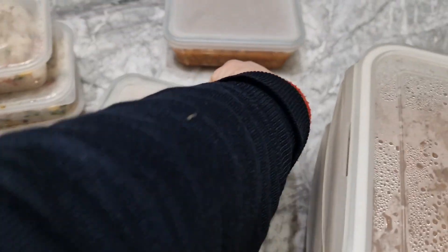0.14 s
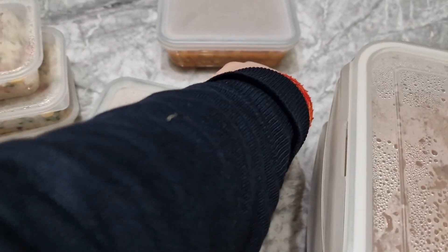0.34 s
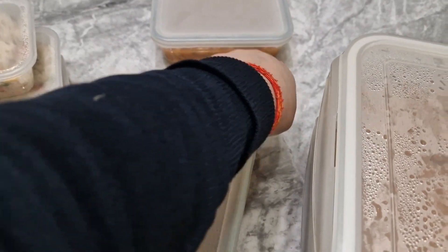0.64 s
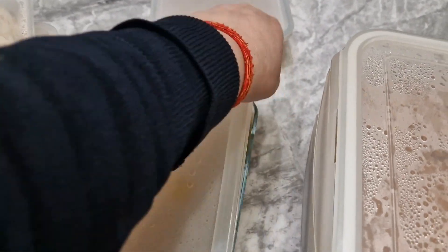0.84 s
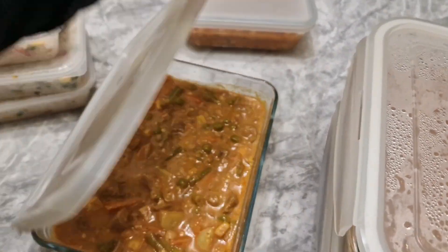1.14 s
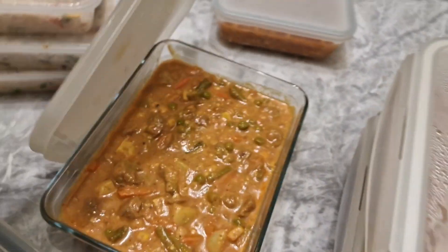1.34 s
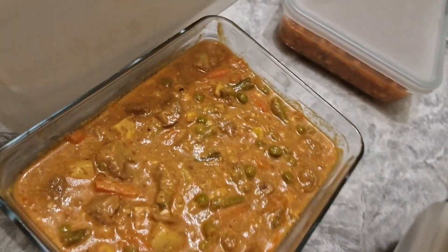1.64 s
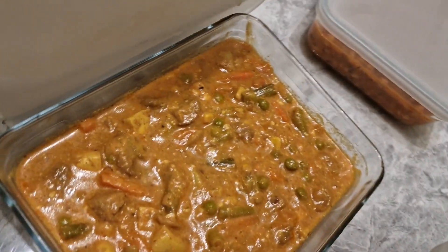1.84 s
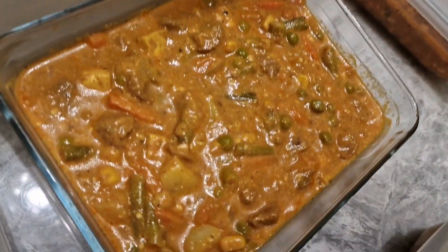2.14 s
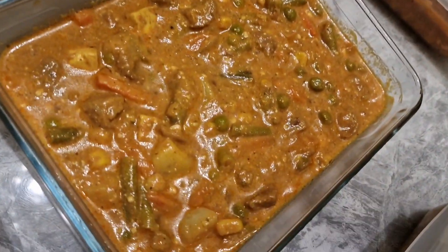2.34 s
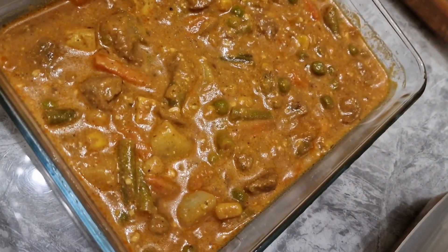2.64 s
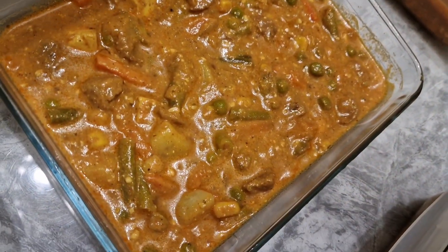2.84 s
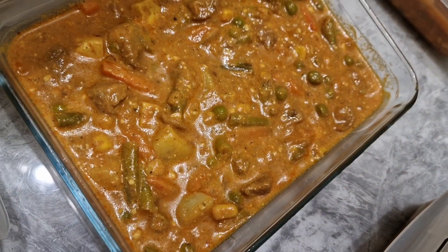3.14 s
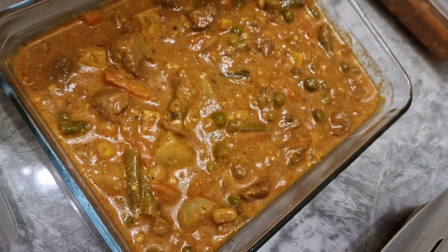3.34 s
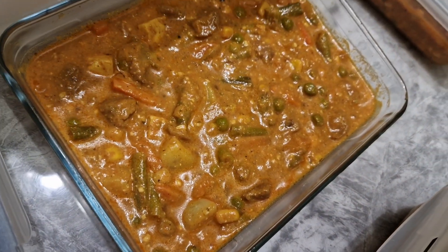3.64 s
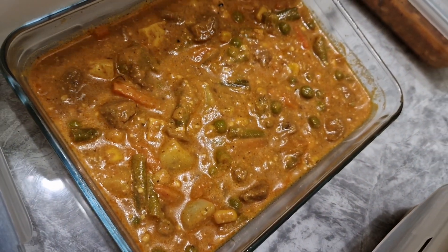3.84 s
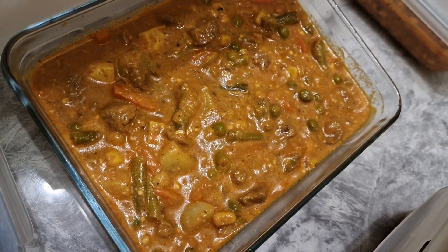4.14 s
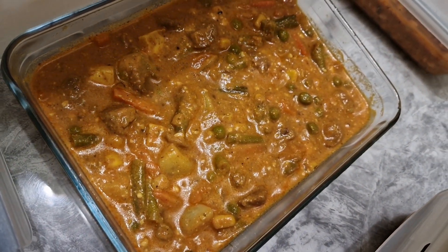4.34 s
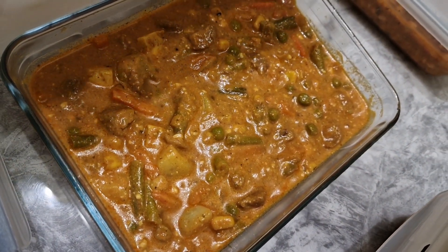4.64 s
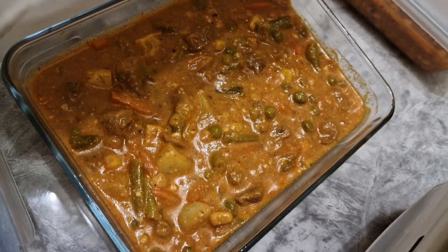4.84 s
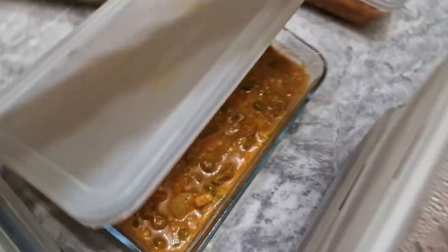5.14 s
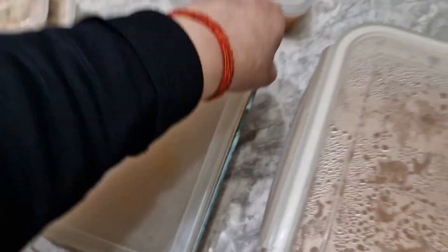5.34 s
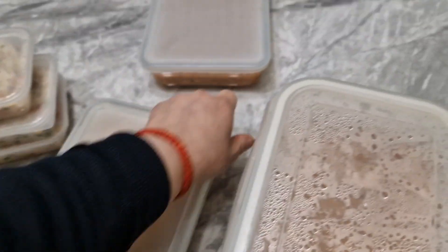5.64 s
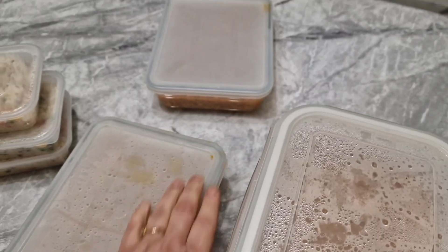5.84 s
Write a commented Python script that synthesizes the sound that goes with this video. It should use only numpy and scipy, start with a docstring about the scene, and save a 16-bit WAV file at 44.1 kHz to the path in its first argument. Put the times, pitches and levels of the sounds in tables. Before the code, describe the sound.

A quiet kitchen with a faint low room hush, heard through close stereo microphones. At about 0.1 s two quick plastic lid taps sound, followed around 0.3 s by a soft, rumbling sleeve brush. At 0.8 s a bright lid snap and a box knock land close together, with another firm knock at 1.3 s. The hardest clatter comes at 1.55-1.6 s, several sharp impacts run together and ringing in the room. Lighter bumps follow at 2.0 and 2.2 s, a small rattling cluster at 2.4 s, then faint scrapes near 2.9 s. Deeper hollow thunks build around 3.5-3.65 s, capped by a hard clack at 3.9 s. Softer lid and box taps continue at 4.1-4.2 s, with a dull low thud at 4.6 s. Tiny rim clicks, a sleeve brush at 5.1 s, a muted lid thunk at 5.5 s and slight scraping finish it.

```python
"""Over a quiet room, lids of plastic food boxes are struck, pressed and made to squeak; a sleeve brushes,
short swells scrape and hiss, rims click. Then come louder knocks of boxes on a stone countertop in a live
kitchen, with faint rubs and scuffs among them, and more lids.
A contact sums filtered clack and snap pulses, decaying box modes and a counter thud, then excites the room.
Rubs are coloured noise in grainy swells; two close-set microphones are alike in the bass only."""
import sys
import numpy as np
from scipy import signal
from scipy.fft import rfft, irfft, next_fast_len
from scipy.io import wavfile
from scipy.ndimage import map_coordinates

SR = 44100
rng = np.random.default_rng(int(sys.argv[2]) if len(sys.argv) > 2 else 0)


def wav_record(signal):
    """Record a signal, one row per channel, as 16-bit PCM in the file named by sys.argv[1]."""
    frames = np.transpose(np.atleast_2d(signal))
    bounded = np.clip(frames, -1, 1)
    # unit amplitude maps onto the largest positive 16-bit level
    quanta = np.round(bounded * 32767).astype(np.int16)
    wavfile.write(sys.argv[1], SR, quanta)


N = 263718
ROOM_SAMPLES = SR  # length of one room response
LEAD = SR // 50  # samples kept free ahead of a contact
T = np.arange(ROOM_SAMPLES) / SR
LARGE_HZ, MEDIUM_HZ, SMALL_HZ = 334, 426, 622  # hollow notes of the three boxes
# left-right likeness of diffuse sound: hz, correlation
ALIKE = [(100, 0.99), (300, 0.84), (520, 0.8), (900, -0.14), (1800, -0.096), (4000, -0.019)]
# standing waves of the kitchen: hz, level_db, t60_s
STANDING = [(69.75, 0.5, 0.99), (106.84, 4, 0.59), (134.9, -2.5, 0.61), (163.6, 0.5, 0.62),
            (177.9, -0.5, 0.34), (267.6, -5.5, 0.88), (381.5, -6.5, 0.9), (514, 5, 0.28), (626, -5.5, 0.8),
            (748, 9.5, 0.28), (893, -3, 0.74), (978, 4.5, 0.32), (1230, 11, 0.19), (1333, 6.5, 0.5),
            (1447, 7, 0.7), (1810, 2.5, 0.18)]


def amp(db):
    """Decibels to gain."""
    return 10 ** (np.asarray(db) / 20)


def unit(x):
    """x at rms 1."""
    return x / np.sqrt(np.mean(x ** 2) + 1e-20)


def blow(x):
    """x with the energy of 10 ms at rms 1."""
    return unit(x) * np.sqrt(.01 * SR / x.shape[-1])


def fade(t, t60):
    """A decay that loses 60 dB in t60 seconds."""
    return np.exp(-np.log(1000) * t / np.maximum(t60, 1e-4))


def along(points, hz):
    """Interpolate (hz, value) points on a log frequency axis."""
    f, v = np.transpose(points)
    return np.interp(np.log(hz + 1), np.log(f + 1), v)


def filtered(x, response):
    """x times a response of frequency."""
    n = x.shape[-1]
    m = next_fast_len(n + 4096)
    return irfft(rfft(x, m) * response(np.fft.rfftfreq(m, 1 / SR)), m)[..., :n]


def pulse(spectrum, size=4096):
    """The shortest causal (minimum-phase) pulse with this spectrum, by folding the cepstrum."""
    cepstrum = irfft(np.log(amp(along(spectrum, np.fft.rfftfreq(size, 1 / SR)))))
    cepstrum[1:size // 2] *= 2
    cepstrum[size // 2 + 1:] = 0
    return irfft(np.exp(rfft(cepstrum)))


def stereo_angle(hz):
    """Half the angle whose cosine is the left-right likeness."""
    return np.arccos(np.clip(along(ALIKE, hz), -1, 1)) / 2


def diffuse(size):
    """White noise from all sides: alike at both microphones in the bass only."""
    def mid_side_gain(hz):
        angle = stereo_angle(hz)
        return np.array([np.cos(angle), np.sin(angle)])

    mid, side = filtered(rng.standard_normal((2, size)), mid_side_gain)
    return np.array([mid + side, mid - side])


def rush(spectrum):
    """Coloured stereo noise of rms 1."""
    return unit(filtered(diffuse(N), lambda hz: amp(along(spectrum, hz))))


def add(track, s, x):
    """Mix x into the track from time s on."""
    start = max(round(s * SR), 0)
    track[:, start:start + x.shape[-1]] += x[:, :max(N - start, 0)]


def room_air(level_db=-61.0):
    """Steady coloured noise of the quiet room."""
    # hz, level_db
    quiet = [(15, -30), (25, -10.5), (76, -8), (212, -6.5), (451, -3.5), (545, -7.5), (659, -15),
             (863, -17), (988, -18), (2160, -20), (5880, -30.5), (7510, -25.5), (10100, -40.5),
             (14800, -44), (16000, -47)]
    return amp(level_db) * rush(quiet)


def lid_sounds():
    """Lids are struck, pressed and made to squeak; small stiff ones thud the counter more, and all snap readily."""
    # start_s, pitch_hz, strength_db, hardness_hz, hollow_over_clack_db, room_over_direct_db
    lid_rows = [ (.127, 671, -29, 1910, -9, -13), (.147, 619, -23.5, 2800, -5.5, -9),
                (.595, 1477, -58.5, 4000, 2.5, -0.5), (.622, 1375, -58.5, 4000, 2, -5),
                (.816, 426, -18.5, 6500, 5.5, -2.5), (.816, 277, -36.5, 2000, 20.5, -7.5),
                (4.132, 333, -31.5, 2200, 5, 0), (4.182, 440, -34, 3980, 3, 1.5),
                (4.592, 281.5, -26.5, 840, 13, -5.5), (4.669, 380, -41.5, 1400, 1, -8),
                (5.532, 285, -29, 1200, 8, -3), (5.535, 163, -35, 3000, 12.5, -3),
                (5.541, 574, -43.5, 2500, 17, 0)]
    snap_over_clack_db = -8.5
    middling_thud_db, middling_hz, thud_rise_db_per_octave = -13, 399.3, 11
    for s, pitch_hz, db, hard_hz, hollow_db, room_db in lid_rows:
        thud_db = middling_thud_db + thud_rise_db_per_octave * np.log2(pitch_hz / middling_hz)
        yield s, pitch_hz, db, hard_hz, hollow_db, thud_db, snap_over_clack_db, room_db


def contact(shape, t60, scatter_db, size=4096):
    """One sharp push, then the crowded, quickly damped modes of the plastic: stereo."""
    burst = amp(scatter_db) * blow(diffuse(size) * fade(T[:size], t60))
    burst += blow(signal.unit_impulse(size))
    return blow(signal.fftconvolve(burst, shape[None], axes=1)[:, :size])


def chatter(x, lead_db=-27, bounce_db=-13, bounce_fall_db=1.9, count=3):
    """A faint graze just before the main contact; after it a few bounces, ever weaker."""
    out = np.zeros((2, x.shape[-1] + LEAD + SR // 5))
    bounce_s = np.cumsum(rng.uniform(.0066, .0264, count))
    bounce_gains = amp(bounce_db - bounce_fall_db * np.arange(count)) * rng.choice([-1, 1], count)
    graze_s = -rng.uniform(0.0059, 0.0066)
    for s, gain in [(0, 1), (graze_s, amp(lead_db)), *zip(bounce_s, bounce_gains)]:
        add(out, s + LEAD / SR, gain * x)
    return out


def hollow(pitch_hz, attack_s=0.0011, size=8192):
    """Air and broad walls ring briefly; so small a body radiates little below its note."""
    # multiple_of_pitch, level_db, t60_s
    modes = [(.59, -5.5, 0.052), (0.998, 8, 0.055), (1.381, -2.5, 0.05), (2.04, -14, 0.083)]
    t = T[:size]
    ring = np.zeros(size)
    for ratio, db, t60 in modes:
        gain = amp(db + rng.normal(0, 1))
        ring += gain * fade(t, t60) * np.sin(2 * np.pi * ratio * pitch_hz * t)
    radiation = signal.butter(2, .5 * pitch_hz, "high", fs=SR)
    return blow(signal.lfilter(*radiation, ring * (1 - np.exp(-t / attack_s))))


WAVES = np.array([np.exp(2j * np.pi * hz * T) * fade(T, t60) for hz, db, t60 in STANDING])


def kitchen(decay, standing_db=-17, build_up_s=0.0061):
    """The room's answer from one spot: a diffuse tail with standing waves in it, energy 1."""
    z = signal.stft(diffuse(ROOM_SAMPLES), nperseg=256)[2]
    tail = unit(signal.istft(z * decay[:, :z.shape[-1]], nperseg=256)[1][:, :ROOM_SAMPLES])
    # low down the room has only a few separate standing waves
    tail = filtered(tail, lambda hz: amp(along([(60, -8.0), (150, -4), (260, -1.0)], hz)))
    hz, db, _ = np.transpose(STANDING)
    # long waves reach both microphones in step, short ones do not
    phase = rng.uniform(0, 2 * np.pi, len(hz)) + np.outer([1, -1], stereo_angle(hz))
    waves = ((amp(db) * np.exp(1j * phase)) @ WAVES).imag
    build_up = 1 - np.exp(-(T / build_up_s) ** 2)
    return unit((tail + amp(standing_db) * unit(waves)) * build_up) / np.sqrt(ROOM_SAMPLES)


def contacts(size=8192, spread_t60=0.023, body_room_db=-2):
    """Every contact mixes clack, snap, thud and hollow note, and sets the kitchen ringing."""
    # pulse spectra: hz, level_db
    clack_spectrum = [(40, -34), (200, 0.5), (420, 5), (900, 7.5), (1400, 2), (2200, -0.5), (2900, -9),
                      (4200, -15), (5500, -22.5), (8000, -22.5), (10000, -50.5), (16000, -49.5)]
    snap_spectrum = [(100, -15.5), (1000, 1.5), (2300, 7), (4000, 6), (5500, -2), (7800, -0.5),
                     (9500, -10.5), (12000, -10), (16000, -14.5)]
    thud_spectrum = [(20, -32.5), (45, -12), (70, -3), (120, 1), (190, 4), (350, -11), (1000, -52.5),
                     (4000, -89.5)]
    # room decay: hz, t60_s
    room_t60 = [(70, 0.71), (200, 0.51), (500, 0.44), (1500, 0.51), (3000, 0.53), (6000, 0.43),
                (10000, 0.33), (16000, 0.29)]
    track = np.zeros((2, N))
    hard_clack = blow(pulse(clack_spectrum, size=size))
    snap = blow(pulse(snap_spectrum, size=size))
    thud = blow(pulse(thud_spectrum, size=size))
    hz, t, _ = signal.stft(T, SR, nperseg=256)
    decay = fade(t, along(room_t60, hz)[:, None])
    for s, pitch_hz, db, hard_hz, hollow_db, thud_db, snap_db, room_db in [*lid_sounds(), *box_sounds()]:
        # a softer touch lasts longer and excites less treble
        softness = signal.butter(2, min(hard_hz, SR / 3), fs=SR)
        clack = blow(signal.lfilter(*softness, hard_clack))
        note = hollow(pitch_hz)
        push = amp(thud_db) * thud
        add(track, s, amp(db) * (amp(hollow_db) * note + push)[None])
        plastic = contact(clack, t60=.032, scatter_db=4)
        plastic += amp(snap_db) * contact(snap, t60=0.017, scatter_db=4.5)
        add(track, s - LEAD / SR, amp(db) * chatter(plastic))
        # the room gathers what all the walls send out in all directions, so its colour is broader
        broad_note = amp(hollow_db + body_room_db) * blow(note * fade(T[:size], spread_t60))
        even_clack = contact(clack, t60=0.037, scatter_db=-6.0, size=size)[0]
        radiated = broad_note + push + even_clack + amp(snap_db) * snap
        room = signal.fftconvolve(radiated[None], kitchen(decay), axes=1)
        add(track, s, amp(db + room_db) * room)
    return track


def swells(rows):
    """Gain of strokes that each rise and fall like a bell curve."""
    t = np.arange(N) / SR
    power = np.zeros(N)
    for middle_s, half_s, db in rows:
        power += amp(db) ** 2 * np.exp(-2 * np.minimum(((t - middle_s) / half_s) ** 2, 20))
    return np.sqrt(power)


def rubs(grain_db=4.0, grain_rate_hz=90, hiss_over_scrape_db=-6):
    """The sleeve rumbles, and short swells scrape and hiss; a random grain roughens them all."""
    # sleeve past the microphones: middle_s, half_length_s, level_db
    brush_rows = [(.274, 0.093, -40), (.708, 0.022, -45.5), (3.13, 0.076, -57.5), (5.1, 0.057, -42.5),
                  (5.47, .04, -55)]
    # short swells of scraping, hissing noise, one just ahead of a knock: middle_s, half_length_s, level_db
    scrape_rows = [(.27, .1, -58), (.708, .02, -51.5), (1.92, .022, -46.5), (2.84, 0.11, -60),
                   (2.935, 0.07, -53.5), (4.32, .2, -58), (4.775, .064, -51), (5.07, 0.098, -58),
                   (5.29, 0.14, -60), (5.665, 0.057, -55), (5.98, .06, -60)]
    # noise spectra: hz, level_db
    rumble = [(20, -9), (60, -2), (110, 6), (200, -3.5), (400, -18), (1500, -62), (8000, -84)]
    scrape = [(60, 2), (300, 0.5), (420, 8), (580, 4.5), (800, 3.5), (1100, 1.5), (1600, -1.5), (2400, -2),
              (3500, -16), (8000, -28.5)]
    hiss = [(300, -25), (1500, -19), (2000, 9), (2500, 1), (3300, 1), (5000, -3.5), (6300, -9.5),
            (8000, -2.5), (9800, -19), (16000, -28)]
    t = np.arange(N) / SR
    sleeve, scraping = swells(brush_rows), swells(scrape_rows)
    hissing = amp(hiss_over_scrape_db) * scraping
    track = np.zeros((2, N))
    for swell, spectrum in (sleeve, rumble), (scraping, scrape), (hissing, hiss):
        knots = rng.standard_normal(int(N * grain_rate_hz / SR) + 4)
        grain = unit(amp(grain_db * map_coordinates(knots, [t * grain_rate_hz], order=1)))
        track += swell * grain * rush(spectrum)
    return track


def clicks(bump_over_tick_db=-1):
    """A rim close by lets go with a very short click and a soft bump, too slight to wake the room."""
    # start_s, level_db
    click_rows = [(.309, -53.5), (1.449, -55.5), (2.98, -57.5), (3.406, -38.5), (4.819, -40.5),
                  (5.043, -49), (5.131, -44), (5.751, -47)]
    # pulse spectra: hz, level_db
    click_spectrum = [(100, -4), (600, 10), (1300, 4.5), (1800, -0.5), (2600, 2.5), (3800, 0), (5500, -19),
                      (8000, -11), (10000, -33), (16000, -30)]
    bump_spectrum = [(20, -21), (60, -12.5), (120, 4.5), (280, -6.5), (600, -6.5), (1000, -31),
                     (4000, -66.5)]
    track = np.zeros((2, N))
    click, bump = pulse(click_spectrum), blow(pulse(bump_spectrum))
    for s, db in click_rows:
        tick = contact(click, t60=0.011, scatter_db=-1.5)
        add(track, s, amp(db) * (tick + amp(bump_over_tick_db) * bump))
    return track


def box_sounds():
    """Soft contacts thud more; a rim barely snaps until a strong one springs it, then the snap grows faster."""
    # knocks, a faint rubbing lead-in before the lid at .816, a faint blurred scuff just before the hardest:
    # start_s, pitch_hz, strength_db, hardness_hz, hollow_over_clack_db, room_over_direct_db
    box_rows = [ (0.702, MEDIUM_HZ, -54, 2500, 5.5, 3), (.783, MEDIUM_HZ, -54, 2100, 8.5, 13.5),
                (.863, MEDIUM_HZ, -19, 2200, -5, -3.5), (1.142, MEDIUM_HZ, -45.5, 1600, -20, -1),
                (1.287, MEDIUM_HZ, -19, 3500, -11, -1.5), (1.543, MEDIUM_HZ, -37, 2500, -14, 11),
                (1.562, MEDIUM_HZ, -12.5, 2700, -17.5, 5), (1.578, MEDIUM_HZ, -16.5, 2450, -17.5, -2.5),
                (1.603, MEDIUM_HZ, -20.5, 2000, -22, -5), (1.954, MEDIUM_HZ, -32, 2500, 3.5, 3.5),
                (2.163, SMALL_HZ, -35.5, 1350, -1.5, -3.5), (2.351, MEDIUM_HZ, -41.5, 2500, 7, 5.5),
                (2.367, MEDIUM_HZ, -29, 5000, -3, 1.5), (2.384, MEDIUM_HZ, -25.5, 3800, -13, -1),
                (2.421, MEDIUM_HZ, -30.5, 1410, -4, 4), (2.589, SMALL_HZ, -35, 1500, -8.5, 0),
                (2.902, SMALL_HZ, -47.5, 4000, -18, -1.5), (3.084, MEDIUM_HZ, -59.5, 500, 12, -7.5),
                (3.439, LARGE_HZ, -41.5, 2200, 13.5, 4), (3.519, LARGE_HZ, -33, 3000, 8, -0.5),
                (3.561, LARGE_HZ, -46, 1800, 16.5, 1.5), (3.636, LARGE_HZ, -23.5, 2700, 8, -4),
                (3.65, LARGE_HZ, -18, 3200, 2, -1), (3.889, LARGE_HZ, -16, 5070, -13, -0.5),
                (3.998, MEDIUM_HZ, -40.5, 1800, 4.5, 7.5), (4.206, 513, -27, 1600, 0.5, -3),
                (4.539, MEDIUM_HZ, -56, 1500, 10.5, 6.5)]
    middling_thud_db, middling_hz, thud_fall_db_per_octave = -8.5, 2440, 7
    rim_db, spring_db, spring_growth_db_per_db = -31, -16, 4.1
    for s, pitch_hz, db, hard_hz, hollow_db, room_db in box_rows:
        thud_db = middling_thud_db - thud_fall_db_per_octave * np.log2(hard_hz / middling_hz)
        snap_db = rim_db + spring_growth_db_per_db * max(db - spring_db, 0)
        yield s, pitch_hz, db, hard_hz, hollow_db, thud_db, snap_db, room_db


def scene():
    """Contacts, rubs and clicks over the steady air of the room."""
    return room_air() + contacts() + rubs() + clicks()


def record(dry, top_hz=16200):
    """Each microphone port has its own colour; nothing passes above the band limit."""
    # hz, left_minus_right_db
    ports = [(60, 3.5), (300, 1.5), (550, 5), (1000, 0), (2000, -4), (4000, 2.4), (8000, 2.5),
             (13000, -0.5)]
    return filtered(dry, lambda hz: amp(np.outer([.5, -.5], along(ports, hz))) * (hz < top_hz))


dry = scene()
out = record(dry)
wav_record(out)
```